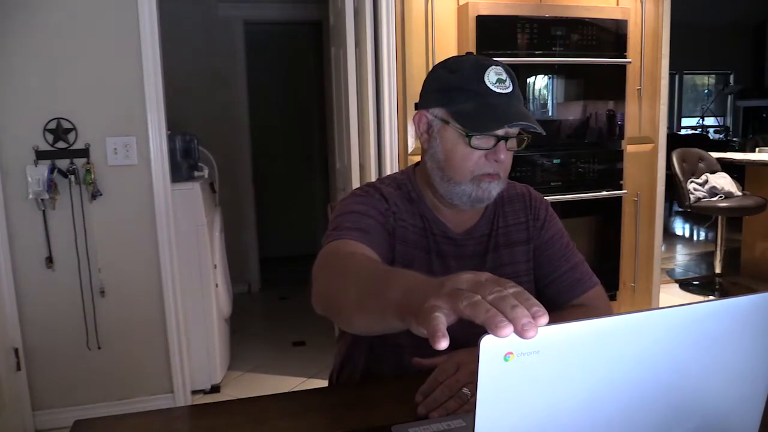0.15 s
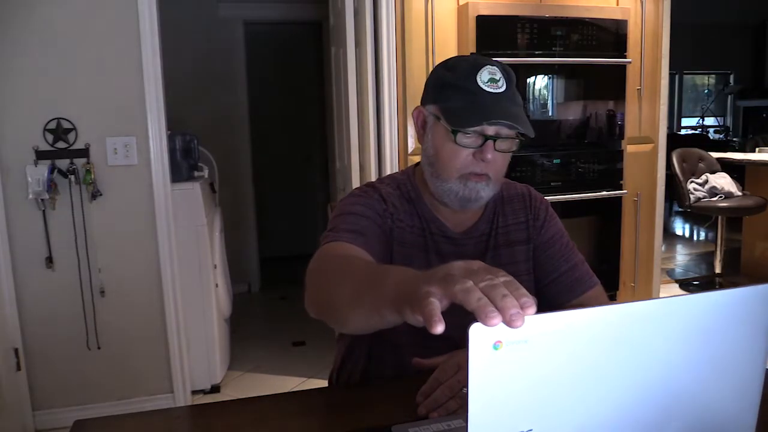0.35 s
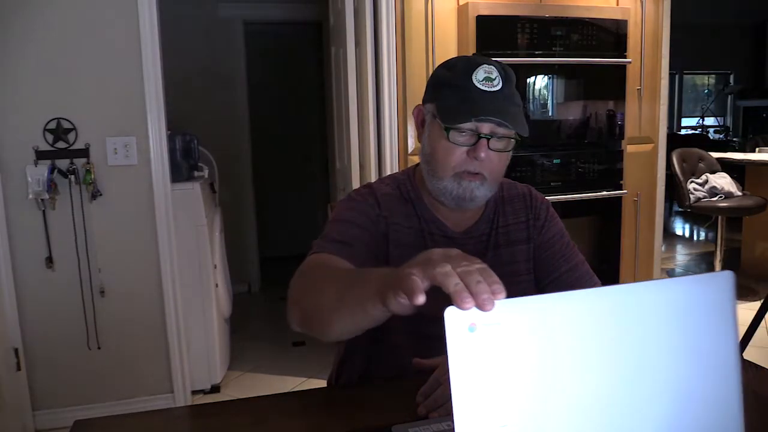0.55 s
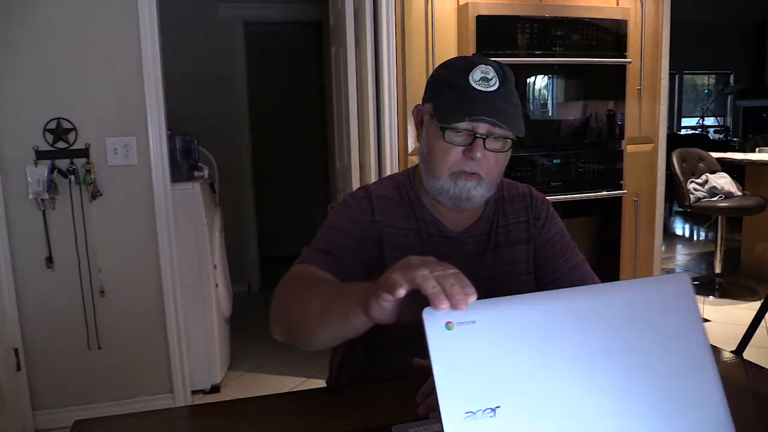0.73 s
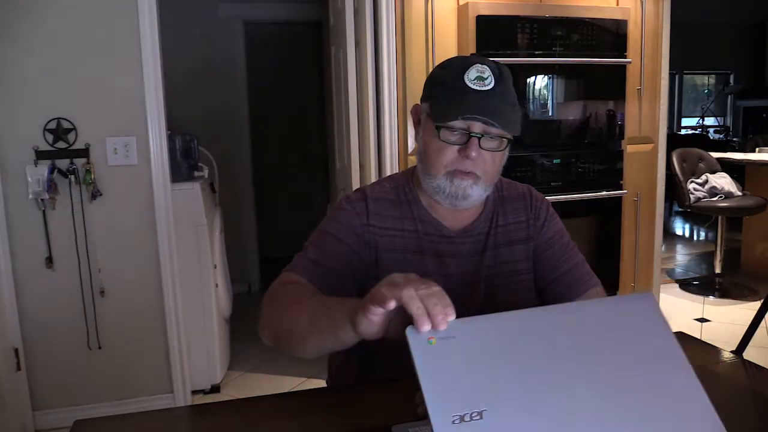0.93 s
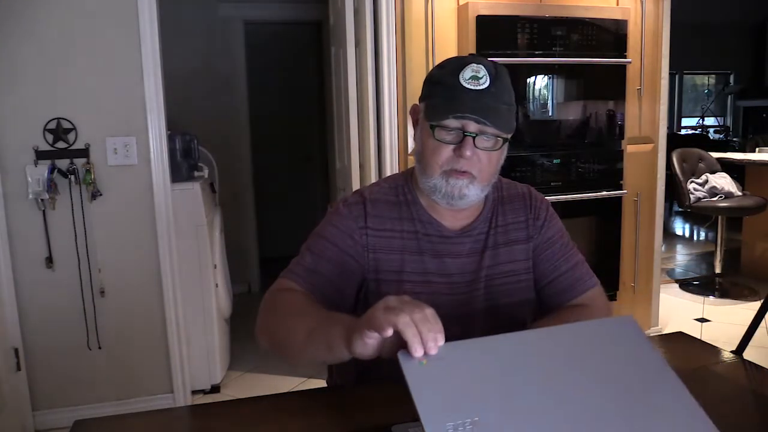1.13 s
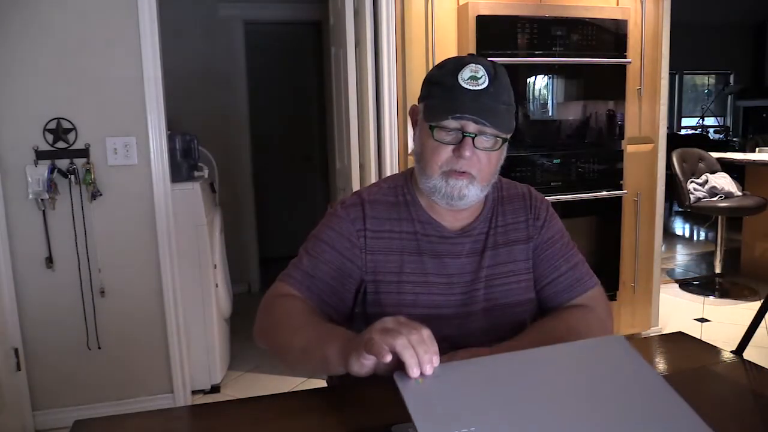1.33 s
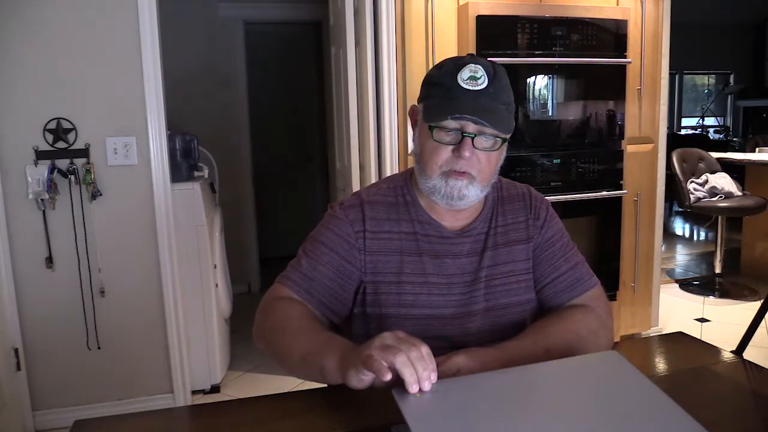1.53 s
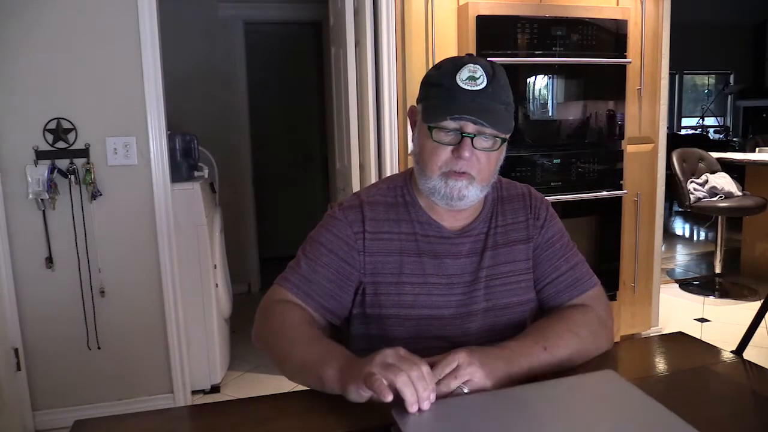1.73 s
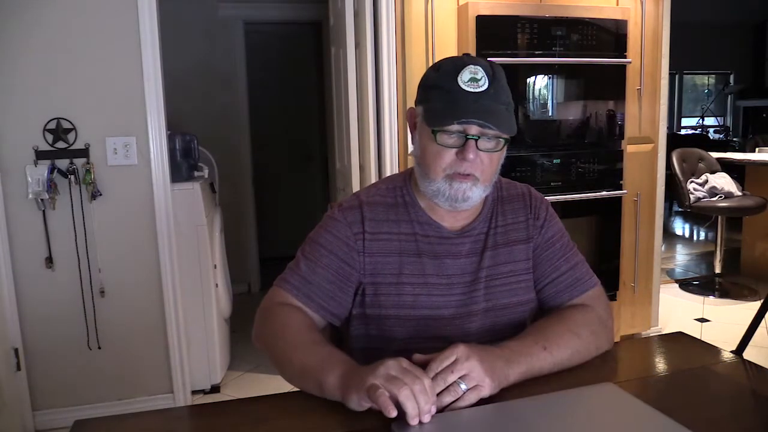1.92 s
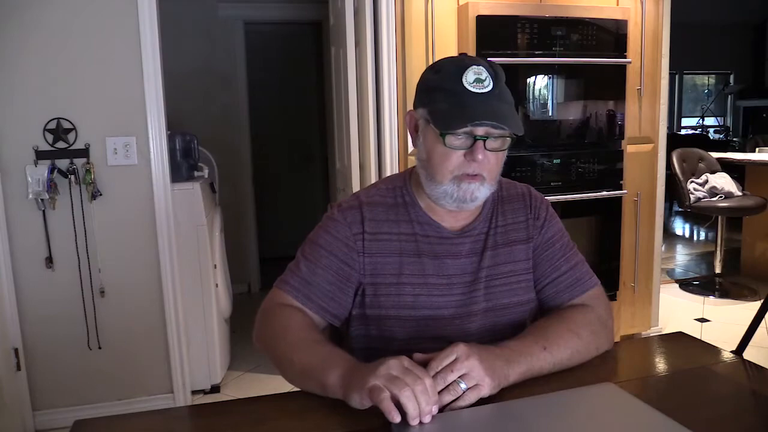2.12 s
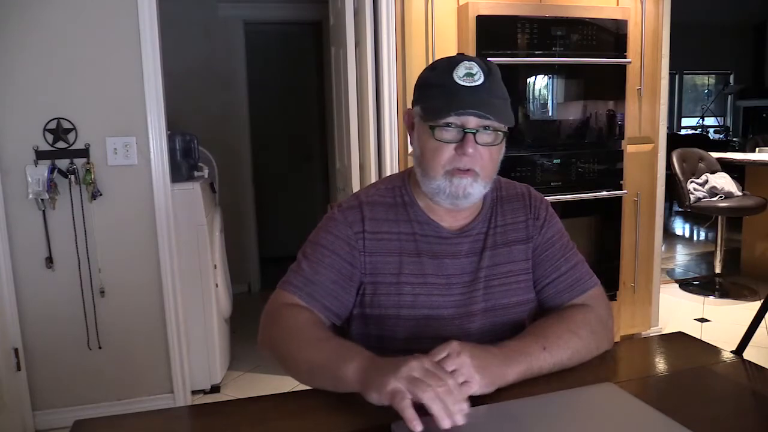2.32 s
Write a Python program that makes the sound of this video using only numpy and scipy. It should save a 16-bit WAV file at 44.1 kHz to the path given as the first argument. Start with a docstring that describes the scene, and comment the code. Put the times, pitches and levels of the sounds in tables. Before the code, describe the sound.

A laptop lid claps shut with one loud, boomy thump on a wooden table indoors.

```python
"""Soft swishes and a low rumble over a quiet, humming room: a laptop is swivelled close by on a wooden table.
Its lid is pushed shut: the edge clacks in nine short contacts, each a pressure pulse with a crack of noise.
Decaying modes ring the plastic case and set the table booming; a brief noise tail is the room's answer.
Last, a hand brushes off the lid as a short burst of shaped noise."""
import sys
import numpy as np
from scipy import signal
from scipy.fft import rfft, irfft
from scipy.io import wavfile

SR = 44100
rng = np.random.default_rng(int(sys.argv[2]) if len(sys.argv) > 2 else 0)


def to_wav(sig):
    """Store sig (one row per channel, or 1-D mono) as 16-bit WAV at the path in sys.argv[1].

    Samples outside -1..1 are clipped; the rate is SR.
    """
    pcm = np.clip(np.atleast_2d(sig), -1, 1) * 32767
    pcm = np.round(pcm).astype(np.int16)
    wavfile.write(sys.argv[1], SR, pcm.T)  # frames by channels


N = 108750

SHUT_S = 1.8724  # the blow that starts the case, table and room


def undb(db):
    """Level in decibels as an amplitude ratio."""
    return 10 ** (np.asarray(db) / 20)


def unit(x):
    """Normalisation to an rms amplitude of 1."""
    return x / np.sqrt(np.mean(x ** 2))


def clock():
    """Time axis: the instant of every sample, in seconds."""
    return np.arange(N) / SR


def colour(x, points):
    """Linear filtering: gains in dB, joined over log frequency, multiply the spectrum."""
    hz, db = np.array(points).T
    f = np.maximum(np.fft.rfftfreq(N, 1 / SR), 1)
    gain = undb(np.interp(np.log(f), np.log(hz), db))
    low_slope = np.minimum(f / hz[0], 1) ** 2  # 12 dB per octave below the first point
    return irfft(rfft(x) * gain * low_slope, N)


def noise(points):
    """Coloured noise: white noise filtered to a spectral shape, then set to rms 1."""
    return unit(colour(rng.standard_normal(N), points))


def cut(x, hz, kind, order=2):
    """Butterworth filtering: maximally flat low-pass or high-pass."""
    sos = signal.butter(order, min(hz, SR / 2 - 1), kind, fs=SR, output="sos")
    return signal.sosfilt(sos, x)


def walk(rate):
    """Slow random modulation: noise low-passed at rate in Hz, of rms 1."""
    return unit(cut(rng.standard_normal(N), rate, "low"))


def fade(t, t60):
    """Exponential damping: the level falls 60 dB in t60 seconds."""
    return np.exp(-np.log(1000) * t / t60)


def ring(modes, t):
    """Modal superposition: damped sines that start together at t = 0."""
    t = np.maximum(t, 0)
    return sum(undb(db) * np.sin(2 * np.pi * hz * t) * fade(t, t60) for hz, db, t60 in modes)


def swell(t, length):
    """Gradual onset: a squared-sine rise from 0 to 1 that starts at t = 0."""
    return np.sin(np.pi / 2 * np.clip(t / length, 0, 1)) ** 2


def background():
    """Stationary noise and frequency modulation: still air, and an appliance's wavering hum."""
    # Spectrum of the room air. Each row: frequency in Hz, relative density in dB per Hz.
    air = [(25, -10.5), (55, -1.5), (85, -15), (120, -4.5), (190, -10), (270, -11.5), (560, -15.5),
           (740, -16.5), (900, -22), (1400, -27.5), (2500, -36), (4500, -40.5), (8000, -44.5),
           (15500, -47.5)]
    # Partials of the hum. Each row: mean frequency in Hz, relative level in dB.
    partials = [(118.4, -45), (166.9, -49), (220.7, -55), (279.9, -57), (360.7, -57), (737.5, -52),
                (1174, -60), (1507, -71)]
    air_db, hum_db = -43, -2.5
    wander_hz, waver_db = 2.56, 1  # rms spread of pitch and level
    hum = np.zeros(N)
    for hz, db in partials:
        level = undb(db + waver_db * walk(2.8))
        phase = 2 * np.pi * np.cumsum(hz + wander_hz * walk(9.8)) / SR
        hum += level * np.sin(phase)
    # the root of 2 makes a sine's level its rms level
    return undb(air_db) * noise(air) + undb(hum_db) * np.sqrt(2) * hum


def handling():
    """Band-limited noise under envelopes: swishes of moving arm and laptop, and a low handling rumble."""
    # Swishes. Each row: peak time in seconds, rise and fall (to 1/e) in seconds, level in dB,
    # upper edge in Hz.
    swishes = [(.02, 0.075, 0.12, -51.5, 4070), (.03, 0.11, 0.11, -57.5, 6900),
               (.13, 0.077, 0.17, -53, 2700), (.33, 0.15, 0.18, -52.5, 3290),
               (.55, 0.053, 0.057, -63, 5100), (.9, 0.12, 0.2, -51.5, 3540), (1.0, 0.11, 0.12, -60, 7400),
               (1.865, 0.036, 0.013, -55.5, 6100)]
    # Level course of the rumble, its last value held. Each row: time in seconds, level in dB.
    rumble_levels = [(0, -44), (.05, -40), (.25, -50), (.36, -52), (.44, -41), (.53, -52), (.7, -62),
                     (1.05, -51), (1.3, -47), (1.6, -54), (1.8, -54)]
    low_edge_hz, rough_db, rumble_hz = 930, 0.5, 45.8
    t, out = clock(), np.zeros(N)
    for at, rise, fall, db, edge_hz in swishes:
        below_edge = cut(rng.standard_normal(N), edge_hz, "low", order=8)
        rub = unit(cut(below_edge, low_edge_hz, "high", order=1))
        envelope = np.exp(-((t - at) / np.where(t < at, rise, fall)) ** 2)
        out += undb(db) * rub * envelope
    # low-pass and high-pass at one frequency leave a narrow band
    below = cut(rng.standard_normal(N), rumble_hz, "low", order=4)
    rumble = unit(cut(below, rumble_hz, "high"))
    rumble_gain = undb(np.interp(t, *np.array(rumble_levels).T))
    return out * undb(rough_db * walk(40)) + rumble * rumble_gain


def lid():
    """Impact excitation: each contact pushes the air and cracks; a longer contact is duller."""
    # Contacts of lid and case, the last as the lid settles. Each row: start in seconds,
    # relative level in dB, contact length (time constant of the smoothing) in ms.
    contacts = [(1.8725, -4, 0.041), (1.8732, 2, .055), (1.87415, 2, 0.1), (1.875, -6, .3),
                (1.8807, -1, 0.4), (1.8845, -11, 0.18), (1.888, -17, 0.17), (1.9, -17, .15),
                (2.011, -22, .15)]
    # Spectrum of the crack. Each row: frequency in Hz, relative density in dB per Hz.
    crack_spectrum = [(100, 3), (400, 1), (1100, -1), (2000, -3), (3400, 1), (5000, -10), (8000, -7.5),
                      (11000, -15), (15500, -13)]
    push_height, push_peak_ms = .4, .2  # pressure pulse before contact level and smoothing
    crack_db, crack_t60_s = -3, .006
    t, out = clock(), np.zeros(N)
    for at, db, contact_ms in contacts:
        age = np.maximum(t - at, 0)
        rise = 1000 * age / push_peak_ms
        push = push_height * rise * np.exp(1 - rise)
        crack = undb(crack_db) * noise(crack_spectrum) * fade(age, crack_t60_s) * (t >= at)
        soft = np.exp(-1000 / (contact_ms * SR))  # one-pole low-pass
        out += undb(db) * signal.lfilter([1 - soft], [1, -soft], crack - push)
    return out


def case():
    """Modal vibration: the blow rings the plastic case, neighbouring modes moving opposite ways."""
    # Modes of the case. Each row: frequency in Hz, relative level in dB, 60 dB decay in seconds.
    case_modes = [(85, 6, 0.068), (130, 2, 0.087), (222, 0, .14), (345, -5, .11), (422, -5, .16),
                  (572, -2, .1), (730, -3, .11), (855, -7, .08), (1030, 2, .07), (1130, -6, .05),
                  (1514, -5, .08), (1670, -11, .08), (1920, -10, .05), (2600, -5, .035), (3160, -3, .03),
                  (3520, -2, .03)]
    case_db = -20.5
    age = clock() - SHUT_S
    return undb(case_db) * (ring(case_modes[::2], age) - ring(case_modes[1::2], age))


def table():
    """Beating of close modes: the table's deep modes build up after the blow and ring out."""
    # Modes of the table. Each row: frequency in Hz, relative level in dB, 60 dB decay in seconds.
    table_modes = [(44.3, -.8, .43), (50.7, -11.2, 1.33), (54.8, 10.4, .28), (78.8, -13, .38),
                   (124, -12, .19), (153, -9, .27), (218, -22, .2), (420, -27, .24)]
    table_db, lag_s, swell_s = 1, .0109, .0527
    age = clock() - SHUT_S - lag_s
    return undb(table_db) * swell(age, swell_s) * ring(table_modes, age)


def room():
    """Diffuse reverberation: a decaying noise tail after the blow, whose treble dies first."""
    # Spectrum of the tail. Each row: frequency in Hz, relative density in dB per Hz.
    room_spectrum = [(100, 2), (250, 1.5), (500, 2.5), (1100, 1), (2000, -4), (3500, -9.5), (5000, -14),
                     (8000, -17.5), (11000, -25.5), (15500, -25)]
    room_db, onset_s = -24.5, 0.0027
    low_t60_s, treble_t60_s = 0.46, 0.29
    age, tail = np.maximum(clock() - SHUT_S, 0), noise(room_spectrum)
    low = cut(tail, 3300, "low", order=1)
    treble = tail - low
    decaying = low * fade(age, low_t60_s) + treble * fade(age, treble_t60_s)
    return undb(room_db) * swell(age, onset_s) * decaying


def hand():
    """Friction noise: the hand brushes off the lid, an exponential rise and fall."""
    # Spectrum of the brush. Each row: frequency in Hz, relative density in dB per Hz.
    brush_spectrum = [(500, 6.5), (2500, -6), (5000, -3), (6000, -2.5), (6600, 3), (7400, -3), (10000, -6),
                      (12000, -12), (15500, -14)]
    peak_s, rise_s, fall_s, brush_db = 2.313, .024, .016, -42.5  # rise and fall to 1/e
    t = clock()
    envelope = np.exp(-abs(t - peak_s) / np.where(t < peak_s, rise_s, fall_s))
    return undb(brush_db) * noise(brush_spectrum) * envelope


def scene():
    """Mid-side stereo: sources just right of centre; phase, diffuse sound and hiss part the channels."""
    # Stereo width of diffuse sound. Each row: frequency in Hz, side against mid in dB.
    width = [(30, -25), (125, -21), (500, -23), (2000, -30.5), (6000, -18), (15500, -7)]
    hiss_side_db, clack_side_db = -71.5, -26
    balance_db = -.85  # left against right
    blow = lid() + case() + table()
    mid = blow + room() + handling() + hand() + background()
    # fresh random draws make the side independent of the mid
    diffuse = colour(room() + handling() + background(), width)
    hiss = undb(hiss_side_db) * rng.standard_normal(N)
    quarter_turn = signal.hilbert(blow).imag  # every partial shifted by 90 degrees
    side = diffuse + hiss + undb(clack_side_db) * quarter_turn
    sign = np.array([[1], [-1]])
    return (mid + sign * side) * undb(sign * balance_db / 2)


def record(dry):
    """Soft saturation and band limiting: the recorder rounds the loudest peaks and cuts the top."""
    ceiling, knee = 0.96, 7  # top level before the filter, hardness of the bend
    top_hz = 15900
    rounded = dry / (1 + abs(dry / ceiling) ** knee) ** (1 / knee)
    low_pass = signal.ellip(10, .1, 80, top_hz, fs=SR, output="sos")
    return signal.sosfilt(low_pass, rounded)


dry = scene()
out = record(dry)
to_wav(out)
```